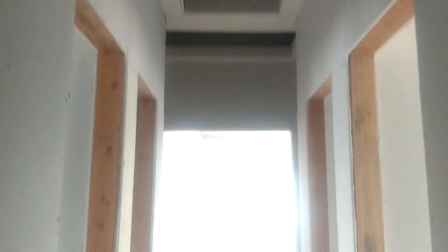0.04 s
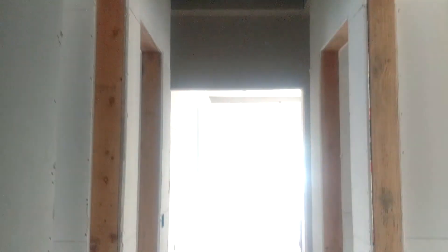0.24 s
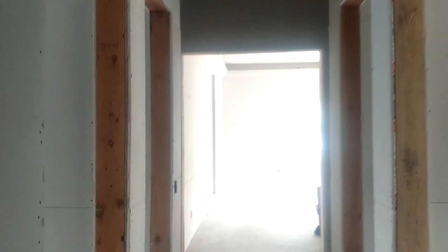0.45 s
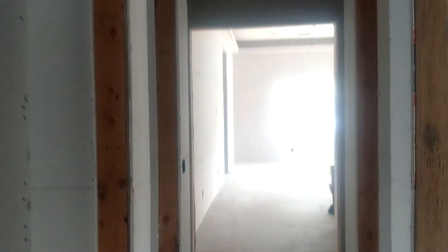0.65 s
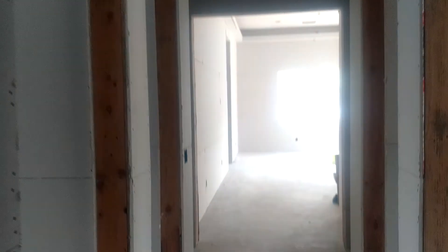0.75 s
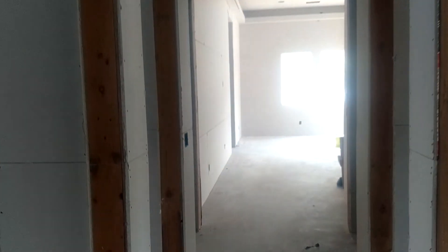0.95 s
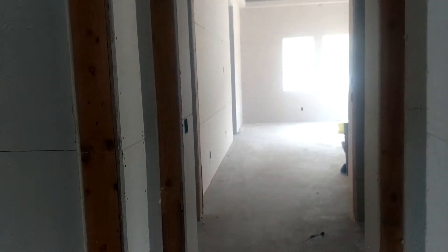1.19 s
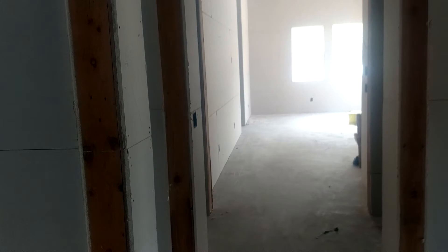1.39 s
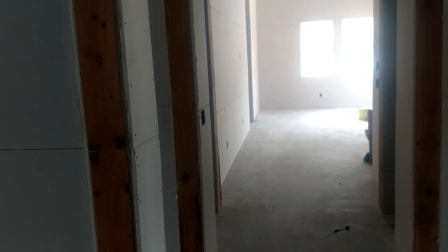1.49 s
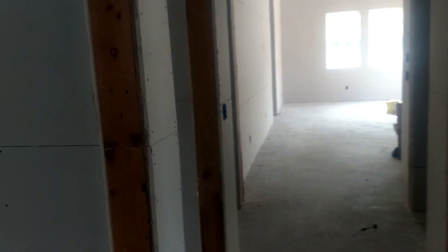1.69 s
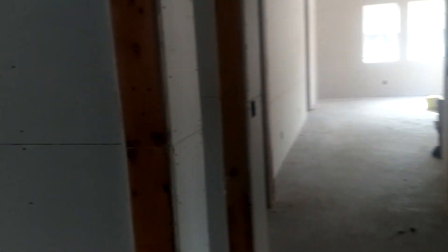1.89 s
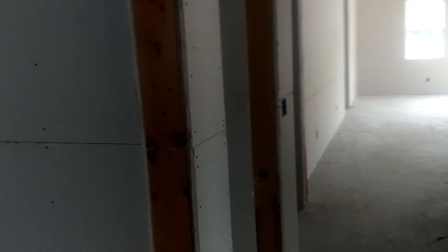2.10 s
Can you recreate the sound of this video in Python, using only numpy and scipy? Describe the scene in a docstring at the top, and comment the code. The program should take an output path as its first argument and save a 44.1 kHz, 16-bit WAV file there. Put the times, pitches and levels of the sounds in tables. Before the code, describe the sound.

Two sharp footsteps on gritty concrete echo in an empty hallway.

```python
"""Two footsteps on a dusty concrete floor in the bare hallway of an unfinished house.
Heel and sole knock, grit crunches under them, and the hard walls and empty rooms beyond ring on.
Around the steps come soft shuffles, clothing rustle and a tiny close tick, over quiet room air.
It is all heard from a phone in the walker's hand, which widens the stereo image."""
import sys
import numpy as np
from scipy import signal
from scipy.fft import rfft, irfft, next_fast_len
from scipy.io import wavfile

SR = 44100
rng = np.random.default_rng(int(sys.argv[2]) if len(sys.argv) > 2 else 0)


def wrap_up_sound(samples):
    """Save the sound to the file named by the first command line argument, as 16-bit audio."""
    columns = np.atleast_2d(samples).T
    # keep every value between -1 and 1, then stretch to whole-number steps
    tamed = np.clip(columns, -1, 1)
    steps = np.round(tamed * 32767).astype(np.int16)
    wavfile.write(sys.argv[1], SR, steps)


N = 94241
T = np.arange(next_fast_len(N + 2048)) / SR  # the scene, padded
HIT_T = np.arange(8192) / SR  # one short hit
ROOM_T = np.arange(40960) / SR  # the room's response
MIC_SPACING_M, SOUND_M_PER_S = 0.15, 343


def knocks():
    """Each contact of heel or sole on the slab rings the shoe for a few cycles at most."""
    # shoe contacts: start_s, level_db, resonance_hz, width_hz
    contacts = [(0.948, -44.5, 1020, 635), (0.949, -59, 99, 140), (0.952, -39.5, 3520, 640),
                (0.953, -42.5, 1010, 530), (0.978, -34, 895, 430), (1.041, -45, 3410, 700),
                (1.043, -43, 850, 580), (1.7207, -30.5, 966, 695), (1.721, -42.5, 136, 130),
                (1.724, -35, 684, 310), (1.744, -29.5, 830, 560), (1.763, -35, 226, 212),
                (1.770, -34, 1240, 834), (1.777, -33, 637, 253)]
    return sum(hit(irfft(resonance(hz, width, HIT_T)), start, db) for start, db, hz, width in contacts)


def crunches():
    """Sand grains crack under the sole in quickly thinning bursts."""
    # bursts of crushed grit: start_s, level_db, decay_s, tilt_db_per_octave
    crushes = [(0.506, -57, 0.0071, -6.5), (0.533, -59.5, 0.0011, -6.5), (0.949, -29, 0.0088, 1.4),
               (0.973, -34.5, 0.014, 0), (1.039, -36.5, 0.0077, -3), (1.095, -46.5, 0.0011, 1),
               (1.14, -47, 0.006, 4), (1.209, -50.5, 0.0052, 0.5), (1.372, -59.5, 0.0063, 10.5),
               (1.723, -34, 0.004, 0.5), (1.744, -33, 0.0067, 0.5)]
    # tone of the grit: frequency_hz, gain_db
    grit_eq = [(60, -38.5), (300, -4.5), (600, -10.5), (1500, -2), (2300, 0.5), (3300, 0.5), (4200, 1.5),
               (5500, 0), (7400, -2.5), (10000, -11), (15500, -22)]
    grains_per_s, spread_db = 3500, 5.5
    out, n = 0, len(HIT_T)
    for start, db, decay, tilt in crushes:
        cracks = (rng.random(n) < grains_per_s / SR) * rng.choice([-1, 1], n)
        grains = cracks * amp(spread_db * rng.standard_normal(n))
        colour = causal(curve(grit_eq, HIT_T) + tilt * np.log2(bins(HIT_T)))
        out = out + hit(shape(grains * np.exp(-HIT_T / decay), colour), start, db)
    return out


def shuffles():
    """The shoe rubs in dull, soft puffs of noise as the weight shifts."""
    # shoe rubs: start_s, level_db, resonance_hz, width_hz
    rubs = [(0.0, -55.5, 720, 830), (0.021, -51, 140, 86), (0.14, -56, 140, 94), (0.16, -61, 870, 900),
            (0.255, -49.5, 131, 60), (0.35, -54, 650, 910), (0.47, -59, 720, 805), (0.624, -60, 317, 81),
            (0.59, -55.5, 1040, 910), (1.13, -52.5, 333, 140), (1.42, -54, 520, 1000),
            (1.45, -55.5, 433, 487)]
    peak_s = 0.01
    swell = HIT_T * np.exp(-HIT_T / peak_s)
    out = 0
    for start, db, hz, width in rubs:
        puff = rng.standard_normal(len(HIT_T)) * swell
        out = out + hit(shape(puff, resonance(hz, width, HIT_T)), start, db)
    return out


def rustles():
    """Clothing brushes in short swells as the legs swing."""
    # cloth swells: peak_s, half_length_s, level_db, centre_hz, width_hz
    brushes = [(0.31, 0.016, -58, 5800, 11100), (0.378, 0.062, -65.5, 3500, 4030),
               (0.505, 0.028, -66, 3720, 6060), (0.61, 0.055, -60.5, 3060, 1530),
               (0.653, 0.014, -61.5, 4800, 8900), (0.83, 0.079, -61.5, 3080, 1800)]
    cloth, out = diffuse(T), 0
    for peak, half_length, db, hz, width in brushes:
        swell = np.exp(-((T - peak) / half_length) ** 2 / 2)
        out = out + level(shape(cloth, resonance(hz, width, T)), db) * swell
    return out


def ticks():
    """A tiny bright double click on the left, too close to wake the room."""
    # dry clicks beside the microphone: start_s, level_db, decay_s
    clicks = [(0.8166, -51, 0.00064), (0.8209, -58.5, 0.00045)]
    # tone of the clicks: frequency_hz, gain_db
    click_eq = [(800, -24), (2800, -18), (4500, -19), (5700, -8.5), (7500, -8.5), (9700, 2), (11300, -3),
                (12400, -21), (14500, -9), (16000, -9)]
    colour, out = causal(curve(click_eq, HIT_T)), 0
    for start, db, decay in clicks:
        snap = rng.standard_normal(len(HIT_T)) * np.exp(-HIT_T / decay)
        out = out + hit(shape(snap, colour), start, db)
    return pan(db=7.5) * out


def wall_slaps():
    """Early echoes off the near walls, each reaching the two microphones from its own angle."""
    count, first_s, span_s = 24, 0.003, 0.04
    slaps = np.zeros((2, len(ROOM_T)))
    for lateness, angle, size in rng.random((count, 3)):
        skew_s = np.array([1, -1]) * (angle - .5) * MIC_SPACING_M / SOUND_M_PER_S
        arrival_s = first_s + lateness * span_s + skew_s
        slaps[[0, 1], (arrival_s * SR).astype(int)] += (.5 + size) * np.exp(-lateness)
    return slaps


def house_tail():
    """The empty rooms ring on, each band dying away at its own rate."""
    # reverb time of the house: frequency_hz, t60_s
    decays = [(120, 0.19), (240, 0.51), (490, 0.83), (980, 0.83), (2000, 0.96), (4000, 0.85), (8000, 0.66),
              (16000, 0.6)]
    centres = np.array(decays)[:, 0]
    noise, tail = diffuse(ROOM_T), 0
    for (_, t60), solo in zip(decays, np.eye(len(centres))):
        band = curve(np.c_[centres, solo], ROOM_T)
        tail = tail + shape(noise, band) * fade(t60)
    return tail


def hallway(x):
    """A weak direct path, wall slaps, the hallway's short ring and standing wave, and the house's tail."""
    direct_db, build_s, standing_hz = -9.5, 0.003, 321
    build = 1 - np.exp(-ROOM_T / build_s)
    tail = energy(house_tail() * build, db=-4)
    ring = energy(diffuse(ROOM_T) * fade(t60_s=0.19) * build, db=-2.5)
    slaps = energy(wall_slaps(), db=-11.5)
    standing = energy(np.sin(2 * np.pi * standing_hz * ROOM_T) * fade(t60_s=0.64), db=-23.5)
    response = tail + ring + slaps + standing
    response[:, 0] += amp(direct_db)
    return signal.fftconvolve(x[None], response)[:, :len(T)]


def air():
    """Quiet, slightly wavering room tone and the microphones' own hiss."""
    # spectrum of the room tone: frequency_hz, gain_db
    air_eq = [(25, -25), (60, 4), (140, 6.5), (230, -2), (330, 0.5), (480, -5.5), (800, -5.5), (1250, -5.5),
              (1700, -12), (3000, -30.5), (5000, -20.5), (15000, -26.5)]
    waver_db, hiss_db_per_octave = 0.3, -7.5
    waver = np.interp(T, np.linspace(0, T[-1], 18), rng.standard_normal(18))
    room = shape(diffuse(T), amp(curve(air_eq, T)))
    rolloff = amp(hiss_db_per_octave * np.log2(1 + bins(T) / 2000))
    hiss = shape(rng.standard_normal((2, len(T))), rolloff)
    return level(room, db=-54) * amp(waver_db * waver) + level(hiss, db=-62)


def diffuse(t):
    """Noise from all sides at two spaced microphones: alike in the bass, unrelated above."""
    alike = np.sinc(2 * bins(t) * MIC_SPACING_M / SOUND_M_PER_S)
    mid, side = shape(rng.standard_normal((2, len(t))), np.sqrt([1 + alike, 1 - alike]))
    return np.array([mid + side, mid - side])


def hit(x, start_s, db):
    """Place a short sound, with the energy of 50 ms held at this level."""
    out, i = np.zeros(len(T)), int(start_s * SR)
    out[i:i + len(x)] = energy(x, db)[:len(T) - i] * np.sqrt(0.05 * SR)
    return out


def fade(t60_s):
    """A room decay that falls 60 dB in the given time."""
    return np.exp(-np.log(1000) * ROOM_T / t60_s)


def resonance(hz, width, t):
    """The response of a band-pass applied twice."""
    f = bins(t)
    return 1 / (1 + 1j * (f ** 2 - hz ** 2) / (f * width)) ** 2


def causal(db):
    """The minimum-phase response with these gains: it never rings ahead of a hit."""
    cepstrum = irfft(db * np.log(10) / 20)
    cepstrum[1:len(cepstrum) // 2] *= 2
    cepstrum[len(cepstrum) // 2 + 1:] = 0
    return np.exp(rfft(cepstrum))


def shape(x, response):
    """Filter by a frequency response."""
    return irfft(rfft(x) * response, x.shape[-1])


def curve(points, t):
    """A table read at every frequency, straight on a log axis."""
    hz, value = np.array(points, float).T
    return np.interp(np.log(bins(t)), np.log(hz), value)


def bins(t):
    """Frequencies of the spectrum of a sound as long as t."""
    return np.maximum(np.arange(len(t) // 2 + 1) * SR / len(t), 1)


def pan(db):
    """Left and right gains for a level difference."""
    return amp(np.vstack([db, -db]) / 2)


def energy(x, db):
    """Scale to a total energy per channel."""
    return level(x, db) / np.sqrt(x.shape[-1])


def level(x, db):
    """Scale to an rms level."""
    return x * amp(db) / np.sqrt(np.mean(x ** 2) + 1e-30)


def amp(db):
    """Decibels to gain."""
    return 10 ** (np.asarray(db) / 20)


def scene():
    """The feet sound through the hallway; cloth and ticks stay close and dry over the room tone."""
    moved_on_s = 1.65  # farther along, the second step gets its own echoes
    feet = knocks() + crunches() + shuffles()
    steps = hallway(feet * (T < moved_on_s)) + hallway(feet * (T >= moved_on_s))
    return (steps + rustles() + ticks() + air())[:, :N]


def record(dry):
    """The phone widens the stereo image, favours the left in the treble and cuts the top."""
    # widening, each channel fed inverted and late into the other: frequency_hz, gain_db
    crossfeed = [(60, -2), (400, 1), (1100, -11.5), (2200, -0.6), (3300, -7.2), (4400, -2.5), (5500, -9),
                 (6500, -6.5), (7600, -9.5), (9500, -26), (16000, -35)]
    # tone of the left-right difference, lifted in the bass: frequency_hz, gain_db
    side_eq = [(30, 2), (70, 2), (140, 7.5), (260, 0.5), (420, -1), (600, 1), (1000, -10.5), (2000, 1),
               (8000, -1)]
    # left microphone over the right: frequency_hz, difference_db
    balance = [(150, 0), (600, 2), (1200, -0.5), (3000, 1.5), (6000, 2), (9000, 5), (15000, 2)]
    crossfeed_s, top_hz = 0.0004591, 15800
    mics = rfft(dry, len(T))
    delay = np.exp(-2j * np.pi * bins(T) * crossfeed_s)
    wide = mics - mics[::-1] * amp(curve(crossfeed, T)) * delay
    mid = wide.mean(axis=0)
    side = (wide - mid) * amp(curve(side_eq, T))
    stereo = irfft((mid + side) * pan(curve(balance, T)), len(T))[:, :N]
    return signal.sosfilt(signal.ellip(10, .2, 80, top_hz, fs=SR, output="sos"), stereo)


dry = scene()
out = record(dry)
wrap_up_sound(out)
```